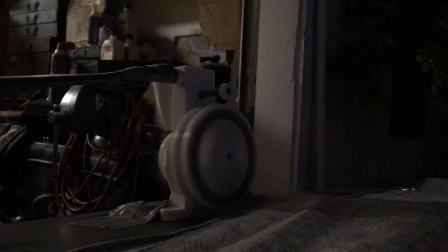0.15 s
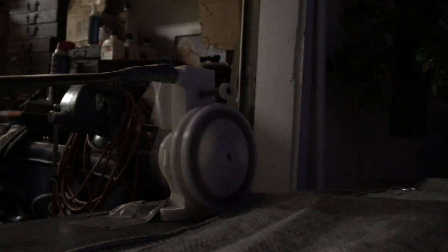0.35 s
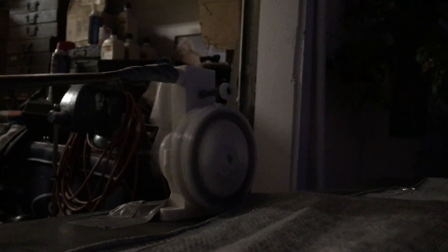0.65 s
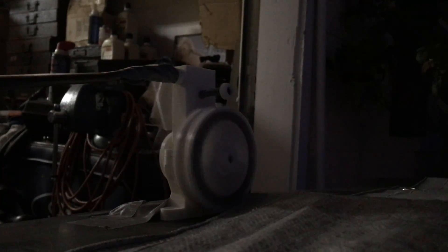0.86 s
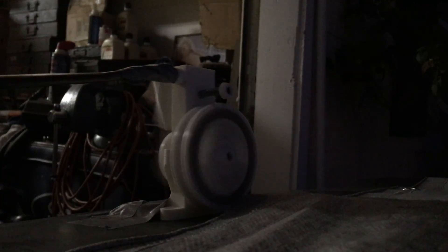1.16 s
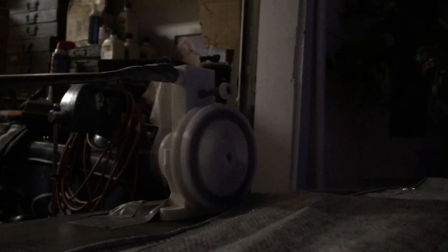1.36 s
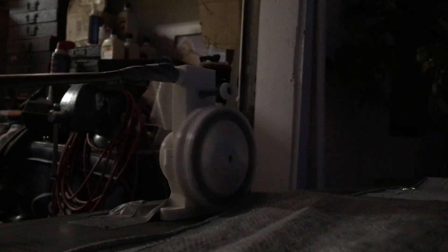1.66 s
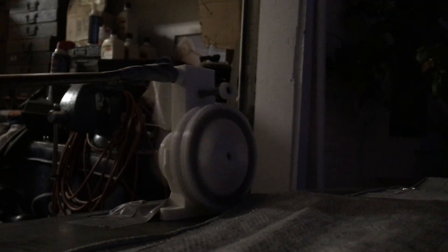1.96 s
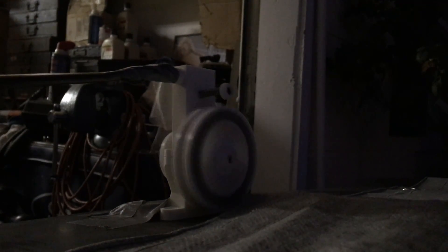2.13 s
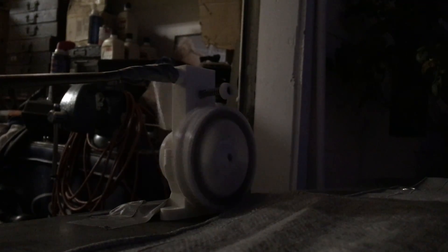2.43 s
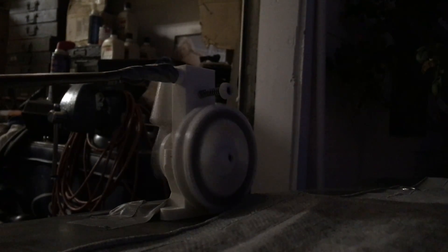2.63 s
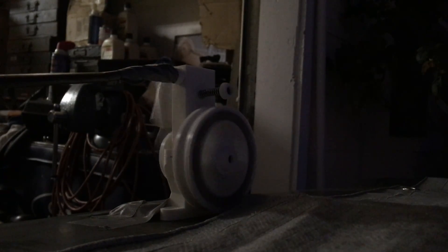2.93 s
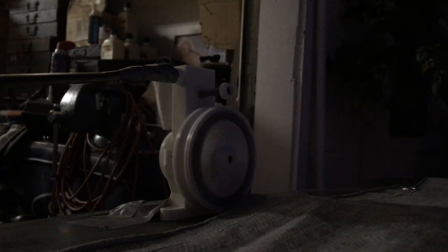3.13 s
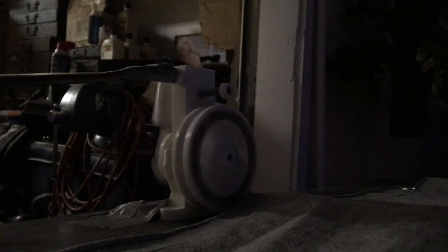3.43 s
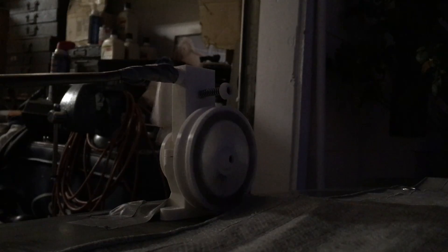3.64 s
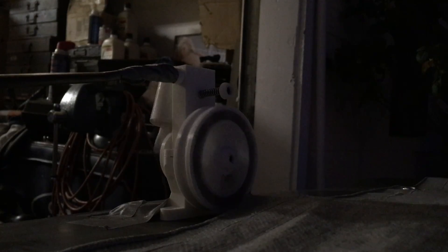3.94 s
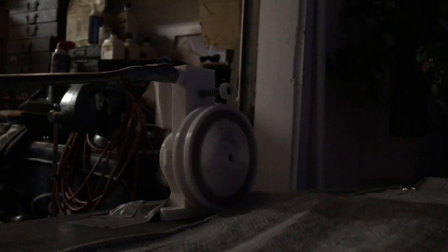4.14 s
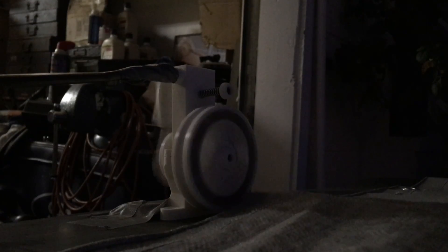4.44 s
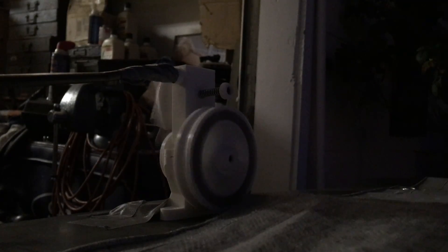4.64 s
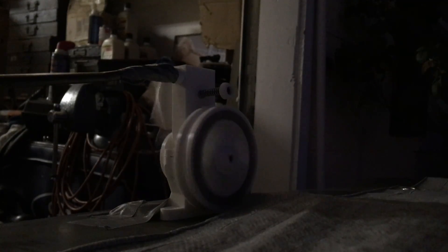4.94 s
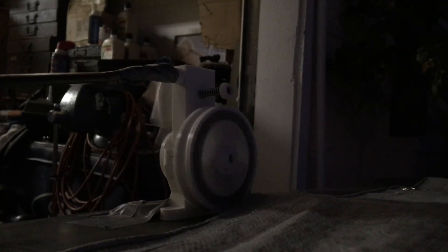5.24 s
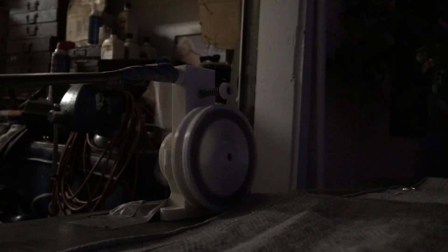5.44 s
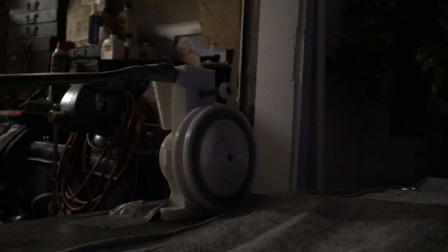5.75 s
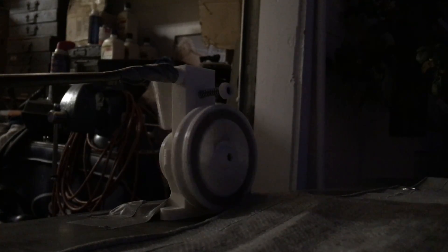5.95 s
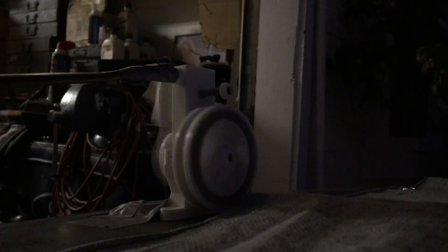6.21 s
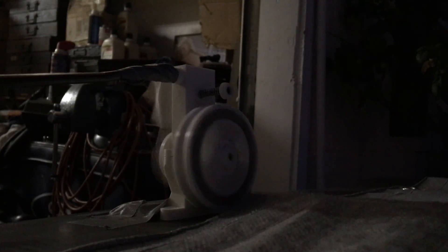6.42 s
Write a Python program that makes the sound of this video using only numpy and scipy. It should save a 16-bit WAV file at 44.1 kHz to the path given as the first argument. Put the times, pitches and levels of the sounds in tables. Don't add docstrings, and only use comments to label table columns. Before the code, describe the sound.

A rapid buzzing flutter of air bursts, each with a sharp intake puff and two thin airy exhaust whistles, runs evenly with a leaking hiss. It falters into wet spits and slow separate chuffs, then speeds up, sags briefly and climbs again. Plastic ticks, dull piston thumps and wooden rattling sit underneath; a small, near microphone gives a dry, slightly overloaded sound.

```python
import sys
import numpy as np
from scipy import signal
from scipy.fft import rfft, irfft
from scipy.io import wavfile
from scipy.ndimage import uniform_filter1d

SR = 44100
rng = np.random.default_rng(int(sys.argv[2]) if len(sys.argv) > 2 else 0)


def convert_level_to_amplitude(level_db):
    exponent = np.asarray(level_db, float) / 20
    return 10 ** exponent


def bounce(signal):
    frames = np.transpose(np.atleast_2d(signal))
    limited = np.clip(frames, -1, 1)
    pcm = np.round(limited * 32767).astype(np.int16)
    wavfile.write(sys.argv[1], SR, pcm)


N = 290178

FULL_SPEED = 21.2
START_TURN = -.386
VALVE_LEAD_S = .0012
STUMBLE_S = 0.055

# (t/s, speed/turns a second)
SPEED = [(0.0, 20.328), (0.82, 21.147), (2.26, 21.374), (2.54, 19.477), (2.61, 17.851), (3.1, 10.459),
         (3.46, 7.613), (3.55, 6.506), (3.72, 6.694), (3.85, 5.74), (4.58, 12.245), (4.73, 12.266),
         (4.86, 13.914), (5.58, 12.095), (5.9, 10.211), (5.99, 10.061), (6.44, 15.069), (6.58, 15.243)]
# (t/s, pressure/dB)
LINE = [(0, 1), (.4, 1.5), (1.4, 1), (2.3, 1), (2.45, -3.5), (2.7, -12), (2.92, -16), (3.08, -10),
        (3.25, -1), (3.68, 0.5), (3.76, 4), (4.3, 3), (4.9, 1.4), (5.1, -0.9), (5.5, -0.1), (5.75, -4),
        (6.06, 4), (6.58, 2)]
# (t/s, inlet level/dB, port level/dB)
STUMBLES = [(2.49, 0, 2), (2.65, -2, 1.2), (2.775, 5, -2.5), (2.845, -4, -7), (2.912, -4, 5),
            (2.992, 3.5, -4), (3.078, 0, 2), (3.175, 3.5, -1.5), (3.68, -2.5, -2), (3.84, -1.5, 3),
            (4.0, -.4, -2), (6.08, 2, -2)]

# (opens/turn, shuts/turn, opening edge/turn, shutting edge/turn, level/dB)
INLET_OPENINGS = [
    (-.2, 0.08, 0.22, 0.017, 1.5),
    (.03, 0.13, .04, 0.014, -7),
]
EXHAUST_OPENINGS = [
    (.235, .33, .03, .02, 0),
    (.42, .52, .04, .02, -.5),
    (.2, .62, .025, .025, -7),
    (-.17, .13, .04, .02, -4),
]
LEAK_OPENINGS = [
    (-.2, .13, 0.071, .02, 3),
    (-.1, .05, .08, .08, -9),
    (.2, 1, 0.033, 0.055, -21.5),
]
RUSH_OPENINGS = [
    (-0.153, 0.17, 0.023, .02, -3.7),
    (0.18, 0.31, 0.021, 0.022, -0.8),
    (0.25, 0.63, 0.055, 0.013, -1),
    (0.043, 0.11, 0.022, .02, 0.5),
    (0.42, 0.47, .02, .02, -1.5),
]
WHOOSH_OPENINGS = [
    (-0.18, -0.091, 0.053, 0.12, 0),
]

# (f/Hz, level/dB per Hz)
INLET_JET = [(1500, -15), (3000, -28), (4500, -13.5), (6500, -1), (9500, 4), (11500, -1.5), (13000, -7),
             (15800, -24)]
EXHAUST_JET = [(1500, -15.5), (3500, -18.5), (5800, -1), (9000, -5.5), (11500, -8), (15500, -15)]
LEAK_JET = [(1500, -8.5), (4000, -17.5), (6000, -0.5), (9000, 4), (12000, 7), (14500, 11.5), (15900, 12)]
RUSH_JET = [(60, -27), (130, 10.5), (280, -2.5), (450, -4.5), (900, -4.5), (1500, 0), (4000, -4),
            (8000, -48)]
WHOOSH_JET = [(1000, -3.5), (2500, 4), (4500, 4.5), (7000, 8.5), (11000, -0.5)]
# (f/Hz, width/Hz, level/dB)
PORT_WHISTLE = [(7920, 320, 12), (9480, 260, 8)]
# (f/Hz, width/Hz, level/dB)
RUSH_DIPS = [(662, 23, -1.5), (626, 33, -0.5)]
# (f/Hz, width/Hz, level/dB)
REFLECTIONS = [(550, 27, -4.5), (2580, 900, -6.5), (3280, 990, 5), (3750, 490, -5.5), (4450, 420, 6.5),
               (4920, 860, -3), (6850, 340, 4), (8900, 360, -3), (10470, 240, -7.5), (11700, 1270, 3),
               (12800, 800, -0.5)]

# (angle/turn, lag when slow/turn, thump level/dB, thump length/ms, tick level/dB)
KNOCKS = [
    (-.185, .08, -23.5, 2.7, -24.5),
    (.25, .2, -26, 2.9, -29),
]
# (t/s, top knock level/dB, bottom knock level/dB)
DRIVE = [(0, 0, 2), (2.33, 1, 0), (2.45, -14, -5.5), (3.1, -16, -6), (3.7, -20, -16), (4.1, -1, -20),
         (4.7, -17, -0.5), (5.5, -9, -7), (5.9, -17, -17), (6.2, -5, -8), (6.58, -5, 1)]
# (angle/turn, level/dB)
SLACK_TAPS = [
    (-.28, -34.5),
    (0.092, -30.5),
    (.4, -31),
    (.52, -34.5),
]
# (f/Hz, width/Hz, level/dB)
CASING = [(253, 26, -8), (466, 40, 1), (612, 45, 2), (678, 35, 0), (1400, 600, 7)]
# (f/Hz, width/Hz, level/dB)
BENCH_MODES = [(100.5, 10.4, 0), (138, 67, -11.5), (184.6, 82, -6)]
# (f/Hz, width/Hz, level/dB)
BASE_MODES = [(291, 47, -1), (378.5, 25, -1)]
# (t/s, half length/s, board level/dB)
ROCKS = [(0, 0.14, -29.5), (.3, 0.091, -33), (1.07, 0.03, -31), (1.3, 0.051, -34), (1.92, 0.027, -39),
         (2.7, .12, -36), (2.86, 0.11, -30), (3.1, 0.047, -28.5), (3.3, .05, -35), (3.5, 0.024, -30.5),
         (3.62, 0.044, -37), (3.8, 0.036, -32.5), (3.97, 0.06, -35), (4.2, 0.03, -39), (4.47, 0.1, -34),
         (4.7, 0.15, -32.5), (4.95, .06, -29.5), (5.15, 0.094, -31.5), (5.45, .2, -31.5),
         (6.18, 0.082, -26.5), (6.42, 0.047, -26.5), (6.56, .06, -31.5)]
# (t/s, half length/s, level/dB)
JOLTS = [(0, 0.039, -38), (.31, 0.073, -38), (1.08, 0.023, -39), (1.94, .04, -42), (2.42, 0.07, -40),
         (2.91, .03, -42), (3.19, 0.068, -37), (3.57, 0.041, -44), (3.85, 0.049, -38), (4.11, 0.025, -34.5),
         (4.35, 0.087, -38), (4.62, 0.09, -34.5), (4.99, 0.055, -37.5), (5.5, 0.3, -44), (6.2, 0.09, -37),
         (6.37, 0.037, -37.5), (6.58, 0.12, -34.5)]
# (t/s, peak level/dB)
SPITS = [(2.5974, -17), (2.7374, -12), (2.7806, -12), (2.807, -8), (2.829, -7), (2.8484, -10),
         (2.899, -7.5), (2.951, -2.5), (2.997, -8), (3.07, -10), (3.108, -14), (3.163, -8), (5.014, -20),
         (5.088, -13), (5.66, -16), (5.733, -16), (5.751, -18), (5.918, -13)]
# (f/Hz, level/dB)
BASS_CUT = [(20, -40), (32, -20), (42, -9.5), (60, -2.5), (90, -0.5)]


def evened(x):
    return x / np.sqrt(np.mean(x ** 2) + 1e-20)


def held(x):
    return x / np.sqrt(uniform_filter1d(x ** 2, size=3000))


def along(table, column):
    rows = np.array(table, float)
    return np.interp(np.arange(N) / SR, rows[:, 0], rows[:, column])


def bumps(times, widths, heights):
    t = np.arange(N)[::64, None] / SR
    bells = heights * np.exp(-((t - times) / widths) ** 2)
    return np.repeat(bells.sum(axis=1), 64)[:N]


def swells(table, rest_db):
    s, half, db = np.transpose(table)
    return np.sqrt(convert_level_to_amplitude(rest_db) ** 2 + bumps(s, half, convert_level_to_amplitude(db) ** 2))


def coloured(x, slope=((1, 0), (2, 0)), bells=()):
    hz = np.fft.rfftfreq(N, 1 / SR)
    f, level = np.transpose(slope)
    db = np.interp(np.log(hz + 1), np.log(f), level)
    for at, width, peak_db in bells:
        db += peak_db / (1 + (2 * (hz - at) / width) ** 2)
    return irfft(rfft(x) * convert_level_to_amplitude(db), N)


def resonate(x, hz, width):
    r = np.exp(-np.pi * width / SR)
    ringing = signal.lfilter([1 - r], [1, -r * np.exp(2j * np.pi * hz / SR)], x + 0j)
    return 2 * ringing.real


def crank():
    speed = along(SPEED, column=1)
    return START_TURN + np.cumsum(speed) / SR, speed


def slowness(speed):
    return np.clip(1 - speed / FULL_SPEED, 0, 1)


def level_db(speed, full_speed_db, per_pressure_db, standstill_db):
    return full_speed_db + per_pressure_db * along(LINE, column=1) + standstill_db * slowness(speed)


def gate(turns, openings, spread_db, shift, closed_db=-43.0):
    power = convert_level_to_amplitude(closed_db) ** 2 * np.ones(N)
    for opens, shuts, rise, fall, db in openings:
        which = np.round(turns - (opens + shuts) / 2).astype(int) + 2
        luck = rng.standard_normal((110, 2))[which]
        angle = turns - which + 2 - shift * luck[:, 0]
        opening = 1 + np.tanh(2 * (angle - opens) / rise)
        shutting = 1 + np.tanh(2 * (shuts - angle) / fall)
        power += convert_level_to_amplitude(2 * (db + spread_db * luck[:, 1])) * opening * shutting / 4
    return np.sqrt(power)


def jet(slope, flutter_db, bells=()):
    smooth = uniform_filter1d(rng.standard_normal(N), size=90)
    flutter = evened(uniform_filter1d(smooth, size=90))
    hiss = evened(coloured(rng.standard_normal(N), slope, bells))
    return evened(hiss * convert_level_to_amplitude(flutter_db * flutter))


def puff_db(speed):
    s, inlet_db, _ = np.transpose(STUMBLES)
    steady_db = level_db(speed, full_speed_db=-19.5, per_pressure_db=0.47, standstill_db=-5)
    return steady_db + bumps(s, STUMBLE_S, inlet_db)


def inlet_puff(turns, speed):
    flow = gate(turns, INLET_OPENINGS, spread_db=.5, shift=0.011)
    return convert_level_to_amplitude(puff_db(speed) - 0.54) * flow * jet(INLET_JET, flutter_db=2.2)


def exhaust_port(turns, speed):
    s, _, port_db = np.transpose(STUMBLES)
    blow_db = level_db(speed, full_speed_db=-23.5, per_pressure_db=0.043, standstill_db=-6)
    blow_db = blow_db + bumps(s, STUMBLE_S, port_db)
    flow = gate(turns, EXHAUST_OPENINGS, spread_db=1.2, shift=.012, closed_db=-12.)
    return (convert_level_to_amplitude(blow_db + 1.1) * flow + spits()) * jet(EXHAUST_JET, 0.35, PORT_WHISTLE)


def leak_db(speed):
    return level_db(speed, full_speed_db=-23, per_pressure_db=1.0, standstill_db=1.6)


def leaking_line(turns, speed):
    surge = gate(turns, LEAK_OPENINGS, spread_db=0.69, shift=.008, closed_db=-0.89)
    surge = surge ** (0.84 + 0.75 * slowness(speed))
    return convert_level_to_amplitude(leak_db(speed) + 4.0) * surge * jet(LEAK_JET, flutter_db=0.14)


def cylinder_rush(turns, speed):
    rush_db = level_db(speed, full_speed_db=-34.5, per_pressure_db=0.14, standstill_db=0.43)
    flow = gate(turns, RUSH_OPENINGS, spread_db=0.92, shift=0.012, closed_db=-4.0)
    return convert_level_to_amplitude(rush_db + 1.3) * flow * jet(RUSH_JET, 2.1, RUSH_DIPS)


def gusts(speed):
    rumble = jet(((20, -20), (35, -3), (70, -2.5), (130, -21)), flutter_db=0.57)
    return convert_level_to_amplitude(2 * (leak_db(speed) + 27.5) - 48.0) * rumble


def knocks(turns, speed):
    thumps, ticks = np.zeros(N), np.zeros(N)
    for end, (turn, lag, thump_db, ms, tick_db) in enumerate(KNOCKS):
        angle = turns - turn - lag * (1 - speed / FULL_SPEED)
        at = np.flatnonzero(np.diff(np.floor(angle)) > 0)
        luck = rng.standard_normal((110, 3))[:len(at)]
        force_db = along(DRIVE, column=1 + end)[at]
        hits, snaps = np.zeros(N), np.zeros(N)
        hits[at] = convert_level_to_amplitude(force_db + .8 * luck[:, 0])
        delay = (12 * luck[:, 1] + 30).astype(int)
        snaps[np.clip(at + delay, 0, N - 1)] = convert_level_to_amplitude(.5 * force_db + 1.7 * luck[:, 2])
        pull = -signal.windows.hann(int(ms * SR / 500))
        thumps += convert_level_to_amplitude(thump_db) * signal.oaconvolve(hits, pull, "same")
        ticks -= convert_level_to_amplitude(tick_db) * snaps
    return thumps, ticks


def slack(turns):
    taps = np.zeros(N)
    for turn, db in SLACK_TAPS:
        luck = rng.standard_normal((110, 2))
        at = np.flatnonzero(np.diff(np.floor(turns - turn)) > 0)
        luck = luck[:len(at)]
        at = np.clip(at + (25 * luck[:, 0]).astype(int), 0, N - 1)
        taps[at] = convert_level_to_amplitude(db + .4 * along(DRIVE, column=1)[at] + 3.5 * luck[:, 1])
    return taps


def casing(ticks):
    ring = np.zeros(N)
    for hz, width, db in CASING:
        ring += convert_level_to_amplitude(db - 11.5) * resonate(ticks, hz, width) * SR / (2 * np.pi * width)
    return ring


def ringing_modes(drive, modes, second_width):
    return [convert_level_to_amplitude(db) * resonate(resonate(drive, hz, width), hz, second_width * width)
            for hz, width, db in modes]


def bench(thumps, speed):
    rumble = ((60, -25), (90, -1.5), (450, -11.5), (800, -56))
    rocking = evened(coloured(rng.standard_normal(N), rumble))
    drive = evened(thumps) + rocking * convert_level_to_amplitude(-6 - .5 * along(DRIVE, column=2))
    first, *others = ringing_modes(drive, BENCH_MODES, second_width=3)
    base = sum(ringing_modes(rocking, BASE_MODES, second_width=2))
    board_db = level_db(speed, full_speed_db=-35.5, per_pressure_db=.01, standstill_db=-9)
    board = convert_level_to_amplitude(0.76) * swells(ROCKS, board_db) * held(first)
    board += convert_level_to_amplitude(-40.0) * held(sum(others))
    rattle = convert_level_to_amplitude(-2.5) * swells(JOLTS, rest_db=-47) * held(base)
    return board + rattle


def opening_whoosh(turns, speed):
    flow = gate(turns, WHOOSH_OPENINGS, spread_db=0.23, shift=0.017)
    return convert_level_to_amplitude(puff_db(speed) + 6.0) * slowness(speed) * flow * jet(WHOOSH_JET, flutter_db=2.2)


def spits():
    burst = np.zeros(N)
    u = np.arange(900) / SR
    shape = (1 - np.exp(-u / 0.00095)) * np.exp(-(u / 0.0072) ** 2)
    for s, peak_db in SPITS:
        at = round(s * SR)
        burst[at:at + len(u)] += convert_level_to_amplitude(peak_db - 11.0) * shape
    return burst


def scene():
    turns, speed = crank()
    valve_turns = turns + VALVE_LEAD_S * (speed - FULL_SPEED / 2)
    air = inlet_puff(valve_turns, speed) + exhaust_port(valve_turns, speed)
    air += leaking_line(valve_turns, speed) + cylinder_rush(valve_turns, speed)
    air += gusts(speed) + opening_whoosh(valve_turns, speed)
    thumps, ticks = knocks(turns, speed)
    ring = casing(ticks + slack(turns))
    near = coloured(air, bells=REFLECTIONS)
    return (near + thumps + ring + bench(thumps, speed))[None]


def low_pass(x):
    return signal.sosfilt(signal.butter(12, 16840, fs=SR, output="sos"), x)


def record(dry):
    soft = .8 * np.tanh(dry[0] / .8)
    cut = coloured(soft, BASS_CUT)[None]
    band_limit = signal.firwin(1201, 15790, window=("kaiser", 10), fs=SR)[None]
    mix = signal.oaconvolve(cut, band_limit, "same")
    return low_pass(mix)


dry = scene()
out = record(dry)
bounce(out)
```